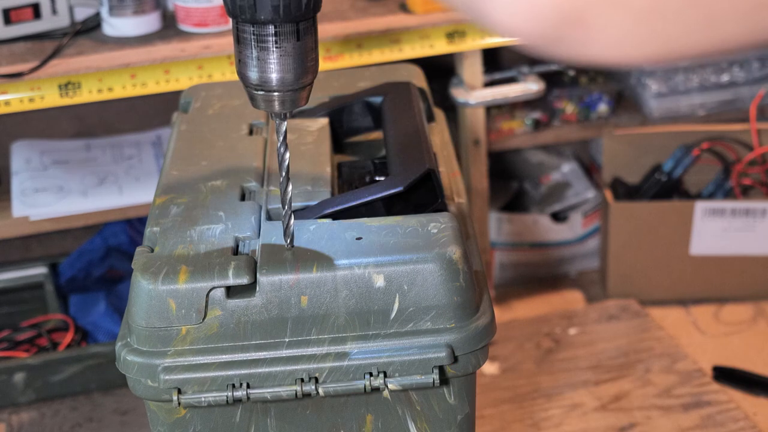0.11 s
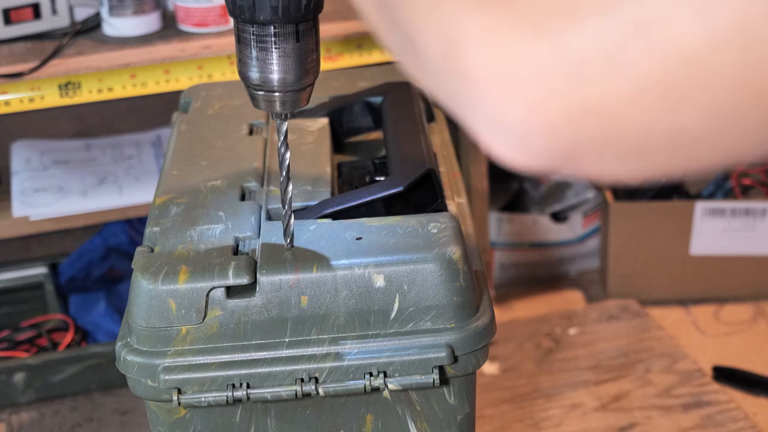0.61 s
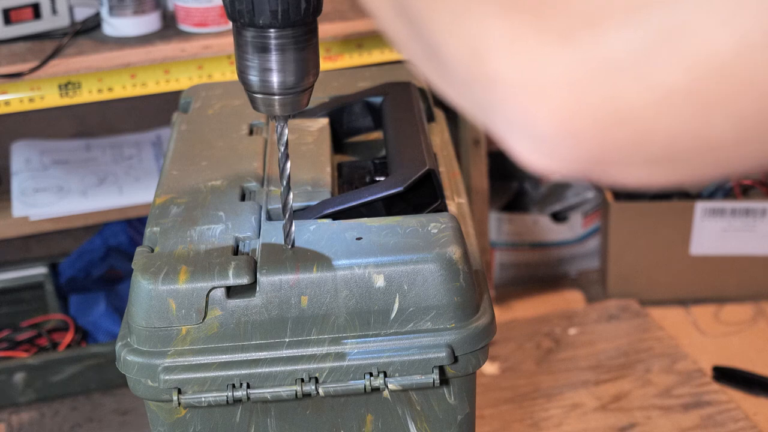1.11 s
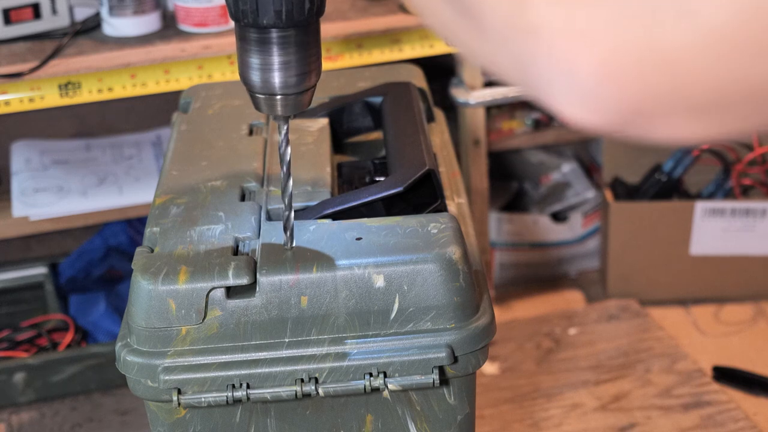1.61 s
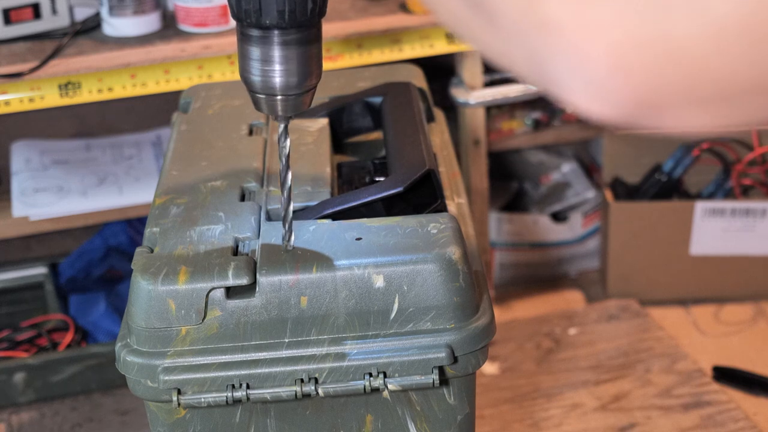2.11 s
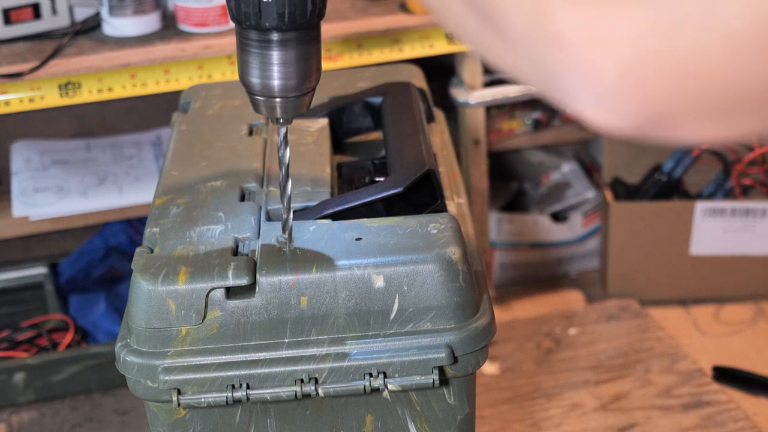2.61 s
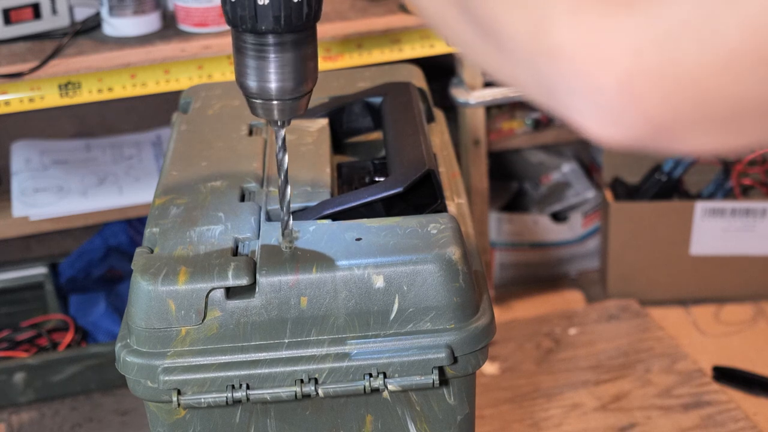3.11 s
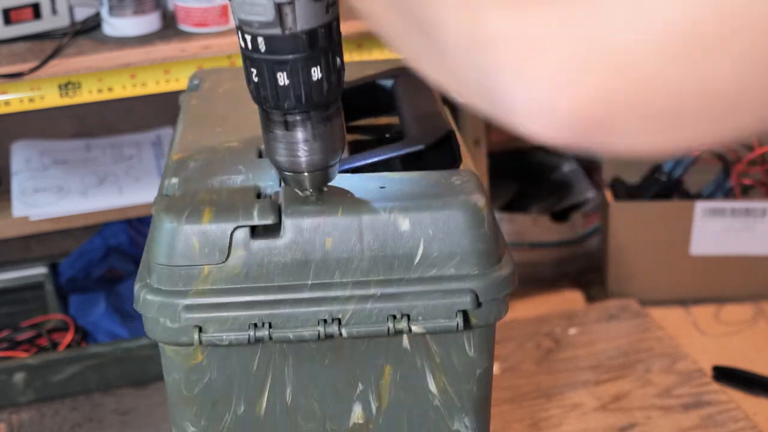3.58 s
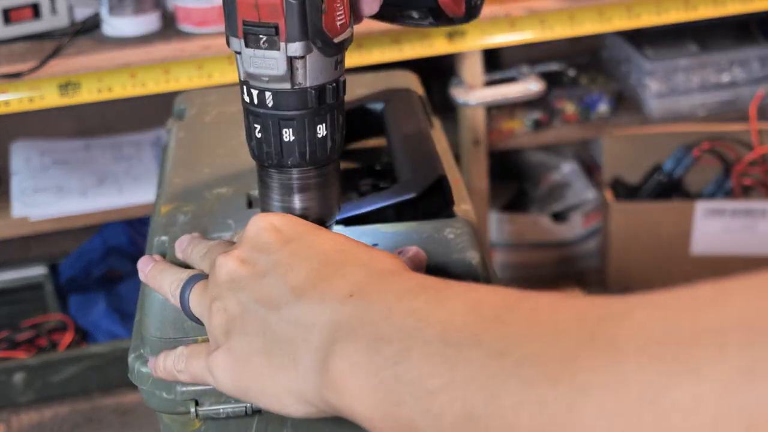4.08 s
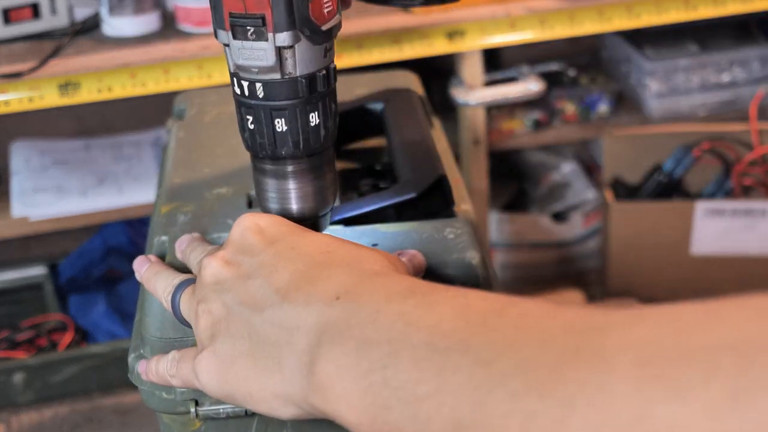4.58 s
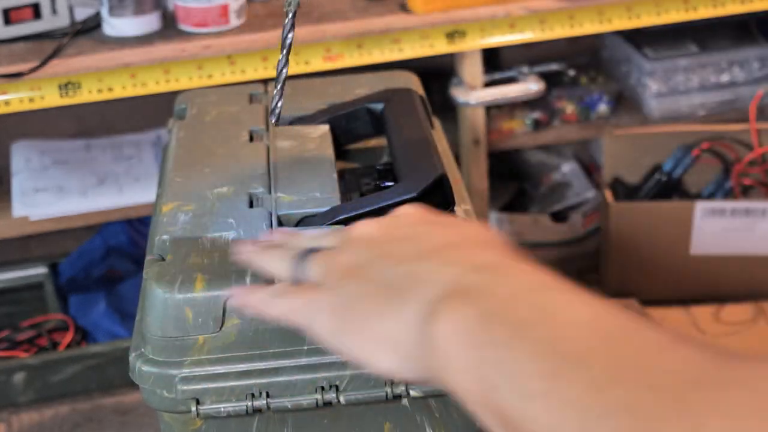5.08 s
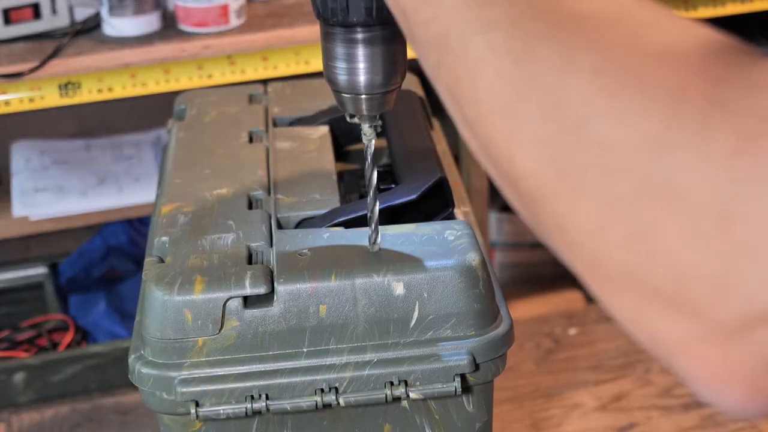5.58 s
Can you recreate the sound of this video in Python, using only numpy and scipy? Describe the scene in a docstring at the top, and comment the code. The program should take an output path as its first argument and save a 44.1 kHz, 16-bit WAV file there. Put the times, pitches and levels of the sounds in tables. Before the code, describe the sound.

A cordless drill whines up and rasps into a hollow plastic lid, breaks through with clattering knocks, backs out, then starts boring again.

```python
"""On a workshop bench a cordless drill bores into the lid of a hollow plastic case, close to one microphone.
Gear teeth whine as sines on the shaft turn; filtered noise makes the rasp, the fan hiss and the boom of the lid.
The speed control whistles; the bit breaks through, the chuck slams down and knocks about (cracks of noise,
decaying modes of lid and steel), the drill backs out and starts again. Room noise and a faint hum lie under it;
twice the sound cuts dead and fades back in."""
import sys
import numpy as np
from scipy import signal
from scipy.fft import rfft, irfft
from scipy.io import wavfile
from scipy.ndimage import uniform_filter1d

SR = 44100
rng = np.random.default_rng(int(sys.argv[2]) if len(sys.argv) > 2 else 0)


def wav_record(signal):
    """Record a signal, one row per channel, as 16-bit PCM in the file named by sys.argv[1]."""
    frames = np.transpose(np.atleast_2d(signal))
    bounded = np.clip(frames, -1, 1)
    # unit amplitude maps onto the largest positive 16-bit level
    quanta = np.round(bounded * 32767).astype(np.int16)
    wavfile.write(sys.argv[1], SR, quanta)


def level_to_linear(level):
    """Convert decibel levels to linear amplitude factors, elementwise."""
    exponent = np.asarray(level, float) / 20
    return 10 ** exponent


N = 251370
TEETH = 10
STEADY_EDGE_S = 0.013  # soft edge of the drags and the bind

# Motor runs from spin-up to brake; the first goes on into the second as the bit bites.
# Each row: time in seconds, tooth rate in Hz, rasp of gears and bit in dB.
RUNS = [
    [(.93, 504, -79), (1.0, 900, -47.5), (1.06, 1150, -33), (1.12, 1198, -34), (1.24, 988, -35.5),
     (1.42, 858, -38), (1.52, 1061, -30.5), (1.6, 1242, -28)],
    [(1.6, 1247, -30), (1.65, 1364, -29), (1.71, 1437, -28), (1.96, 1301, -28.5), (2.13, 1466, -27),
     (2.33, 1654, -26), (2.45, 1688, -26), (2.61, 2016, -24), (2.68, 2056, -23.5), (2.83, 1913, -25),
     (3.05, 1673, -27), (3.3, 1399, -26.5), (3.45, 1416, -29), (3.52, 692, -32), (3.62, 499.2, -28),
     (3.7, 302, -44.5)],
    [(3.96, 400, -54.5), (4.03, 649.4, -43.5), (4.12, 982, -30.5), (4.254, 1436, -28), (4.392, 1714, -25.5),
     (4.582, 1939, -26.5), (4.758, 2081, -24), (4.824, 2134, -25), (4.882, 2051, -26.5),
     (4.93, 1978, -29.5), (4.97, 803, -30.5), (5.08, 299, -54)],
    [(5.11, 298, -62), (5.15, 500, -43.5), (5.205, 600, -41)],
    [(5.21, 1099, -30.5), (5.275, 1240, -29.5), (5.445, 1058, -30.5), (5.485, 1130, -29),
     (5.518, 1727, -26.5), (5.583, 1672, -27.5), (5.7, 1480, -28.5)],
]
# Spectrum of the drill housing. Each row: frequency in Hz, relative level in dB per Hz.
HOUSING = [(240, -39), (400, -11), (798, -12.5), (897, -5.5), (1080, -2.5), (1260, -5.5), (2040, -3.5),
           (2510, -4), (3050, -2), (4120, -3.5), (5140, 0.5), (6410, -10.5), (9000, -29), (11700, -30),
           (19800, -120)]
# Resonances of the housing. Each row: frequency in Hz, width in Hz, height in dB.
HOUSING_PEAKS = [(1110, 100, 4.5), (1600, 160, 3), (2740, 46, 2), (3724, 110, 3.5), (5220, 103, 5),
                 (5636, 170, 4.5)]
# Spectrum of the fan hiss. Each row: frequency in Hz, relative level in dB per Hz.
FAN = [(3710, -43), (6300, -10), (7390, -3), (8150, 1), (8980, 0.5), (15000, -3.5), (15200, -1),
       (16000, -24)]
# Times in seconds at which the sound cuts dead.
CUTS_S = [.1005, 5.2065]


def unit(x):
    """Scale to rms 1."""
    return x / np.sqrt(np.mean(x ** 2))


def curve(column):
    """A column of the runs, interpolated over time."""
    rows = np.concatenate(RUNS)
    return np.interp(np.arange(N) / SR, rows[:, 0], rows[:, column])


def per_run(values, off):
    """One value through each run, off between them, smoothed over 15 ms."""
    t, out = np.arange(N) / SR, np.full(N, float(off))
    for run, value in zip(RUNS, values):
        out[(t >= run[0][0]) & (t <= run[-1][0])] = value
    return uniform_filter1d(out, size=661)


def held(rows, column, edge_s):
    """Gain at each row's dB level from its start to its end in seconds, with soft edges."""
    t = np.arange(N) / SR
    gain = 0
    for row in rows:
        edge = np.clip(np.minimum(t - row[0], row[1] + edge_s - t) / edge_s, 0, 1)
        gain = gain + level_to_linear(row[column]) * edge ** 2
    return gain


def shape_db(hz, points, peaks=()):
    """Level of a spectrum at hz, with resonances on top."""
    p = np.array(points)
    db = np.interp(np.log(hz + 1), np.log(p[:, 0]), p[:, 1])
    return db + sum(top_db / (1 + (2 * (hz - f) / width) ** 2) for f, width, top_db in peaks)


def colour(x, points, peaks=()):
    """Filter x by a spectrum."""
    gain = level_to_linear(shape_db(np.fft.rfftfreq(len(x), 1 / SR), points, peaks))
    return irfft(rfft(x) * gain, len(x))


def walk(rate_hz):
    """Random levels held 1 / rate_hz and slewed; spread near 1."""
    k = int(SR / rate_hz)
    steps = np.repeat(rng.standard_normal(N // k + 1), k)
    return 1.17 * uniform_filter1d(steps, k)[:N]


def add(out, s, sound):
    """Mix a sound in at a time in seconds."""
    i = int(s * SR)
    out[i:i + len(sound)] += sound[:N - i]


def workshop():
    """Air noise and the wavering tones of a distant appliance; 10 dB louder before the first cut."""
    # Each row: frequency in Hz, relative level in dB per Hz.
    room_tone = [(24, -56), (40, -29), (115, 3), (363, -3.5), (680, -7), (873, -2), (1950, -13.5),
                 (2150, -9), (2440, -15), (12100, -28), (16000, -56)]
    # Each row: frequency in Hz, level in dB rms after the first cut, before wavering.
    hum_lines = [(360.7, -81), (592.2, -86), (855.9, -79), (1389, -88), (1658, -88), (2132, -80),
                 (2191, -75), (2250, -85), (2309, -88)]
    t = np.arange(N) / SR
    air = unit(colour(rng.standard_normal(N), room_tone)) * level_to_linear(-68 + walk(7.6))
    hum = sum(np.sqrt(2) * level_to_linear(db + walk(6.3)) * np.sin(2 * np.pi * hz * t) for hz, db in hum_lines)
    return (air + hum) * np.where(t < CUTS_S[0], level_to_linear(10), 1)


def ring(modes, scatter_db):
    """One blow on an object: decaying modes, struck a little differently each time; peak 1."""
    t = np.arange(SR // 2) / SR
    luck = rng.standard_normal((len(modes), 2))
    y = 0
    for (hz, db, t60_s), (a, b) in zip(modes, luck):
        mode_hz = hz * (1 + 0.007 * scatter_db * b)
        y = y + level_to_linear(db + scatter_db * a) * np.sin(2 * np.pi * mode_hz * t) * 1000 ** (-t / t60_s)
    return y / np.abs(y).max()


def crack(treble_db):
    """Plastic cracks: a burst of coloured noise, soft onset, exponential decay; peak 1."""
    # Each row: frequency in Hz, relative level in dB per Hz.
    crack_spectrum = [(410, -12), (700, -8), (1280, 1.5), (3110, -3.5), (3790, -2), (5330, -6.5),
                      (6740, -14.5), (10900, -18.5), (16000, -37)]
    onset_s, t60_s = 0.0009, 0.039
    t = np.arange(SR // 10) / SR
    burst = colour(rng.standard_normal(len(t)), crack_spectrum)
    burst = colour(burst, [(1500, 0), (8000, treble_db)])
    burst = burst * (1 - np.exp(-t / onset_s)) * 1000 ** (-t / t60_s)
    return burst / np.abs(burst).max()


def lid_knocks():
    """Each blow on the lid is a short crack plus the ring of the lid's modes."""
    # Each row: start in seconds, crack peak in dB, relative thump in dB, crack treble tilt at 8 kHz in dB.
    knocks = [(0.851, -49.5, -57, -25), (3.3947, -12, -43, 8), (3.4126, -11.5, -33, 7),
              (3.4282, -20, -16, 0), (3.462, -5.5, -28, 0), (3.4777, -10, -25, -1), (3.489, -9.5, -25, 3),
              (3.494, -6.5, -32, 4), (3.5203, -12, -22, -1), (3.5321, -7.5, -8.5, -14),
              (3.601, -16.5, -10.5, -11), (3.6119, -15.5, -15.5, 16), (3.6241, -20, -25, 2),
              (3.709, -25, -22, -22), (3.7198, -15, -9.5, -12), (3.737, -25.5, -26, -8),
              (3.7742, -30.5, -29, -8), (3.787, -35, -22.5, -10), (3.839, -17.5, -11.5, -31),
              (3.8578, -24.5, -11, 11), (3.875, -40, -26, 2), (3.8937, -19.5, -13.5, -4),
              (3.907, -18.5, -12, -11), (3.9254, -29.5, -26, -4), (3.9737, -29.5, -28, -35),
              (4.9234, -4, -35, 3.5), (4.9427, -5, -36, -2), (4.9663, -9.5, -42, 5),
              (5.158, -50, -40.5, -10)]
    # Each row: frequency in Hz, relative level in dB, t60 in seconds.
    lid_modes = [(126, -29, 0.087), (187.6, -1, 0.14), (251, -4.5, 0.092), (330.3, -12, 0.086),
                 (386, -4, 0.05), (523, -5, 0.03), (590, -24, 0.1), (830, -1, 0.031), (900, -2, 0.034),
                 (1350, -8.5, 0.035), (1550, -25, 0.033)]
    out = np.zeros(N)
    push = np.hanning(int(0.0014 * SR))  # plastic gives way, so the lid is pushed rather than tapped
    for s, crack_db, thump_db, treble_db in knocks:
        add(out, s, level_to_linear(crack_db) * crack(treble_db))
        thump = np.convolve(ring(lid_modes, scatter_db=4.5), push / push.sum())
        add(out, s, level_to_linear(thump_db + 8.5) * thump)
    return out


def steel_snaps():
    """The steel chuck and the spindle lock ring sound their own modes when they snap."""
    # Each row of the snaps: start in seconds, peak in dB.
    chuck_snaps, lock_snaps = [(3.4868, -21), (3.5056, -27), (4.967, -27)], [(3.5842, -17.5)]
    # Each row of the modes: frequency in Hz, relative level in dB, t60 in seconds.
    chuck_modes, lock_modes = [(8064, 0, .07), (10850, -20, .5), (12620, -1, .1)], [(6261, -2, .1), (6860, -30, 1.5), (8414, 0, .08),
                                              (11670, -26, 1.1), (12410, -27, 1.1), (14500, -6, .08)]
    out = np.zeros(N)
    for snaps, modes in ((chuck_snaps, chuck_modes), (lock_snaps, lock_modes)):
        for s, db in snaps:
            add(out, s, level_to_linear(db) * ring(modes, scatter_db=0.3))
    return out


def gear_whine(shaft_hz, turn, middle_db, treble_db):
    """Strong gear lines on multiples of the tooth rate, wavering alone, raised by gear resonances."""
    # Each row: multiple of the tooth rate, relative level in dB.
    gear_lines = [(1, -11.5), (1.5, -12.5), (3, -9)]
    # Each row: frequency in Hz, width in Hz, height in dB.
    gear_peaks = [(1150, 84, 3), (1981, 95, 8.5), (2935, 360, 6.5), (4110, 96, 5.5), (5270, 170, 5),
                  (5690, 270, 5), (6110, 110, 1)]
    flat = [(20, 0), (20000, 0)]
    out = 0
    for k, db in gear_lines:
        order = k * TEETH
        line_db = db + middle_db * (order > 25) + shape_db(order * shaft_hz, flat, gear_peaks)
        out = out + level_to_linear(line_db + 1.83 * walk(40) + 2.5 * walk(9)) * np.sin(order * turn)
    return out


def shaft_orders(shaft_hz, turn, middle_db, treble_db):
    """Weaker lines on multiples of the shaft turn, each flickering alone, coloured by housing or fan."""
    # Each row: multiple of the shaft turn, relative level in dB.
    shaft_lines = [(1, -15), (1.6, -30.5), (2, -28), (20, -9), (40, -4.5), (45, -19), (50, -9), (60, -10),
                   (70, -9.5), (80, -10), (90, -13), (100, -11)]
    named = dict(shaft_lines)
    orders = list(named) + [k for k in range(3, 70) if k not in named and k % 15 and k != TEETH]
    slow = slice(None, None, 64)  # gains are computed every 64 samples
    out = 0
    for k in orders:
        hz = k * shaft_hz[slow]
        if k > 2:
            body_db = np.maximum(shape_db(hz, HOUSING, HOUSING_PEAKS), shape_db(hz, FAN) - 9.0)
        else:
            body_db = middle_db[slow]
        flicker_db = uniform_filter1d(rng.standard_normal(len(hz)), size=24) * (15 if k > 2 else 7)
        held_db = (treble_db if k > 42 else middle_db)[slow] * (k > 25)
        gain = level_to_linear(named.get(k, -21.5) + body_db + flicker_db - 3.5 + held_db)
        out = out + np.repeat(gain, 64)[:N] * np.sin(k * turn + rng.uniform(0, 2 * np.pi))
    return out


def rasp_noise(grit, turn, rasp_db):
    """Gears and bit rasp: noise through the housing, pulsing once a turn."""
    pulsed = grit * (1 + 0.11 * np.cos(turn))
    return unit(colour(pulsed, HOUSING, HOUSING_PEAKS)) * level_to_linear(rasp_db + 0.49 * walk(20))


def fan_hiss(grit, fan_db):
    """The fan hisses: noise in the fan's spectrum, level wavering."""
    return unit(colour(grit, FAN)) * level_to_linear(fan_db + 1.4 * walk(20))


def lid_boom(grit, boom_db):
    """The hollow lid booms: low noise driven by the bit, by its bind and by the dragging chuck."""
    # Each row: frequency in Hz, relative level in dB per Hz.
    boom_spectrum = [(24, -73), (40, -27), (89, -7.5), (167, 0), (234, -2), (355, -8.5), (406, -14),
                     (608, -7.5), (677, -11.5), (1000, -23), (1300, -24), (2200, -120)]
    # The bit binds in the hole while backing out: start in seconds, end in seconds, added boom gain in dB.
    bind = (4.02, 4.855, 14)
    # The chuck drags and rocks on the lid. Each row: start in seconds, end in seconds, rumble in dB.
    drags = [(3.43, 3.66, -30.5), (3.72, 3.8, -32.5), (3.84, 3.935, -32), (3.94, 3.99, -39.5),
             (5.1, 5.2, -58)]
    bind_grows_s = 0.28
    growth = np.clip((np.arange(N) / SR - bind[0]) / bind_grows_s, 0, 1)
    grip = held([bind], column=2, edge_s=STEADY_EDGE_S) * growth
    push = level_to_linear(boom_db) * (1 + grip) + held(drags, column=2, edge_s=STEADY_EDGE_S)
    return unit(colour(grit, boom_spectrum)) * push * level_to_linear(4.6 * walk(14))


def control_whistle():
    """The speed control whistles with its octave, at fixed pitch, while the trigger is part way in."""
    # Each row: start in seconds, end in seconds, whistle in dB rms, octave in dB rms (both then waver).
    whistles = [(.93, 1.2, -53, -51), (1.36, 2.46, -51, -48), (2.62, 3.33, -54, -50), (3.33, 3.5, -47, -60),
                (3.7, 3.85, -63, -70), (3.94, 4.25, -55, -50), (5.23, 5.7, -58, -61)]
    whistle_hz, swell_s = 7858.4, 0.071
    phase = 2 * np.pi * whistle_hz * np.arange(N) / SR
    out = 0
    for k in (1, 2):
        waver = level_to_linear(3.1 * walk(24.96) + 1.8 * walk(6.1))
        out = out + held(whistles, column=1 + k, edge_s=swell_s) * waver * np.sin(k * phase)
    return np.sqrt(2) * out


def drill():
    """Lines, rasp, fan and boom follow the motor's level and speed; the whistle keeps its own times."""
    # How the drill is held, one row a run: whine in dB, its shaft hum and middle lines a further dB,
    # its treble lines a further dB, fan hiss in dB, lid boom in dB; all against the rasp at 1500 Hz tooth rate.
    grips = [(-2.5, -5, -8, -13.5, -17.5), (-0.5, -0.5, -3, -13.5, -17.5), (1, -2, 0.5, -9.5, -21.5),
             (-3, -8, 2, -11, -31), (2.5, -8.5, -3.5, -12.5, -18.5)]
    rasp_db = curve(2) + per_run(np.zeros(len(RUNS)), off=-58)
    octaves = np.log2(curve(1) / 1500)
    whine_db, middle_db, treble_db, fan_db, boom_db = (per_run(v, off=-20) for v in np.array(grips).T)
    whine_db = rasp_db + whine_db + 6.5 * octaves
    fan_db = rasp_db + fan_db + 2.5 * octaves
    boom_db = rasp_db + boom_db - 1 * octaves

    shaft_hz = uniform_filter1d(curve(1), size=700) / TEETH * (1 + 0.001618 * walk(60))
    turn = 2 * np.pi * np.cumsum(shaft_hz) / SR
    lines = gear_whine(shaft_hz, turn, middle_db, treble_db)
    lines = lines + shaft_orders(shaft_hz, turn, middle_db, treble_db)
    lines = np.sqrt(2) * lines * level_to_linear(whine_db)

    grit = rng.standard_normal((3, N)) * level_to_linear(1.34 * walk(900))  # three noises share one roughness
    noise = rasp_noise(grit[0], turn, rasp_db) + fan_hiss(grit[1], fan_db) + lid_boom(grit[2], boom_db)
    return lines + noise + control_whistle()


def wall_echo(near):
    """Echo off the walls: decaying coloured noise, starting after 6 ms, as impulse response."""
    t60_s, wet_db = 0.24, -12
    t = np.arange(int(0.6 * SR)) / SR
    echo = rng.standard_normal(len(t)) * 1000 ** (-t / t60_s) * (t > 0.006)
    echo = colour(echo, [(100, 0.5), (3000, -4.5), (9000, -3.0), (16000, -22)])
    return level_to_linear(wet_db) * signal.fftconvolve(near, echo / np.sqrt(np.sum(echo ** 2)))[:N]


def scene():
    """Near sound, its echo and the room tone, alike in both channels."""
    near = lid_knocks() + steel_snaps() + drill()
    return np.tile(near + wall_echo(near) + workshop(), (2, 1))


def roll_off(x):
    """The treble ends steeply here."""
    return signal.sosfilt(signal.butter(12, 16500, fs=SR, output="sos"), x)


def record(dry):
    """The microphone drops deep bass and top; at each cut the sound stops dead and fades back in."""
    low_hz, top_hz, fade_in_s = 102, 15850, 0.033
    t = np.arange(N) / SR
    band = np.vstack([signal.butter(4, low_hz, "high", fs=SR, output="sos"),
                      signal.ellip(10, 0.2, 70, top_hz, fs=SR, output="sos")])
    gain = np.ones(N)
    for s in CUTS_S:
        gain = gain * np.where(t < s, 1, np.clip((t - s) / fade_in_s, 0, 1) ** 2)
    return roll_off(signal.sosfilt(band, dry) * gain)


dry = scene()
out = record(dry)
wav_record(out)
```